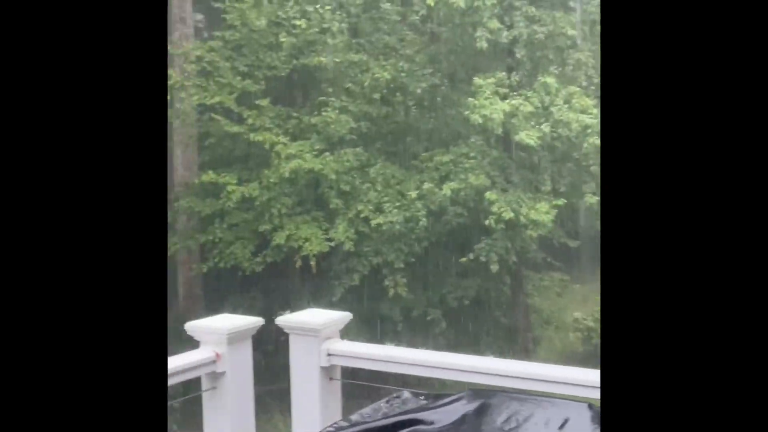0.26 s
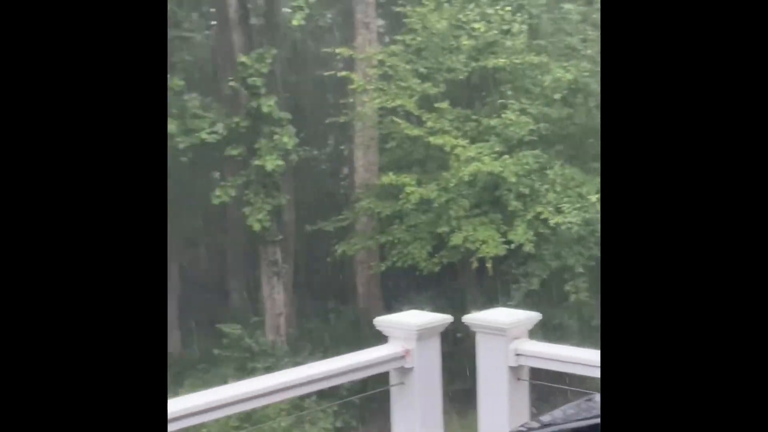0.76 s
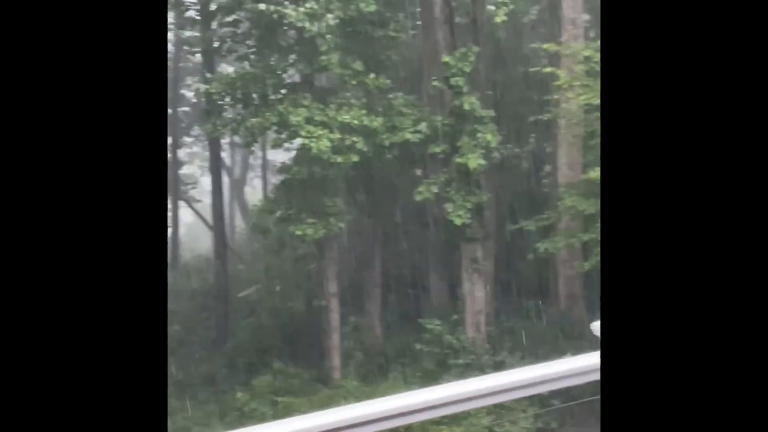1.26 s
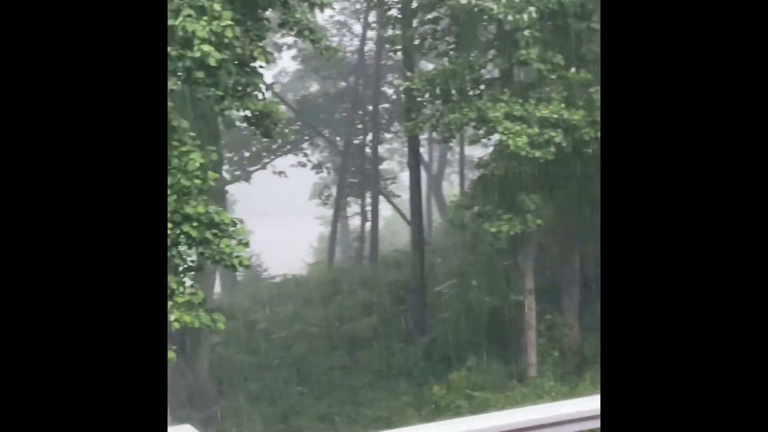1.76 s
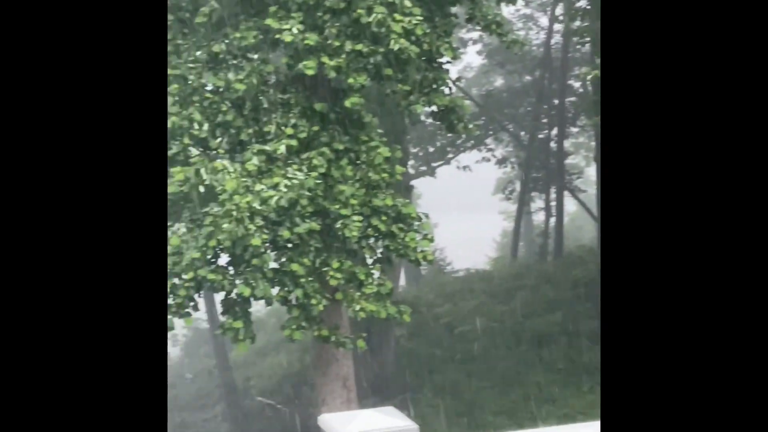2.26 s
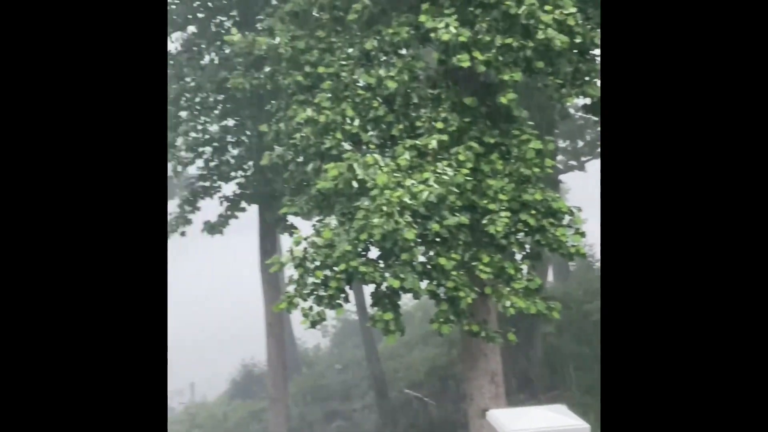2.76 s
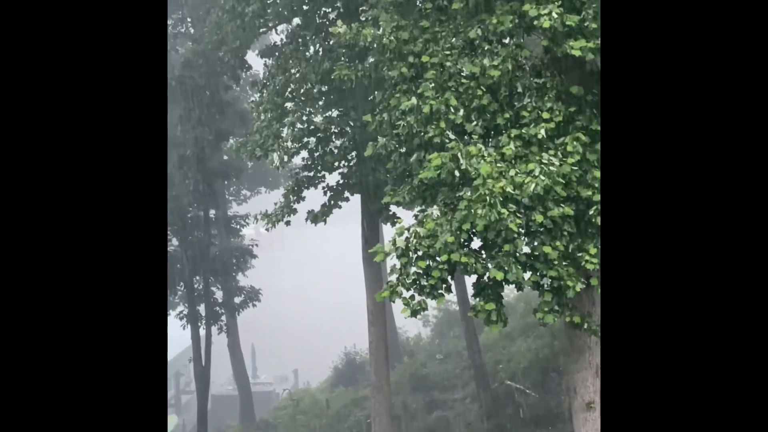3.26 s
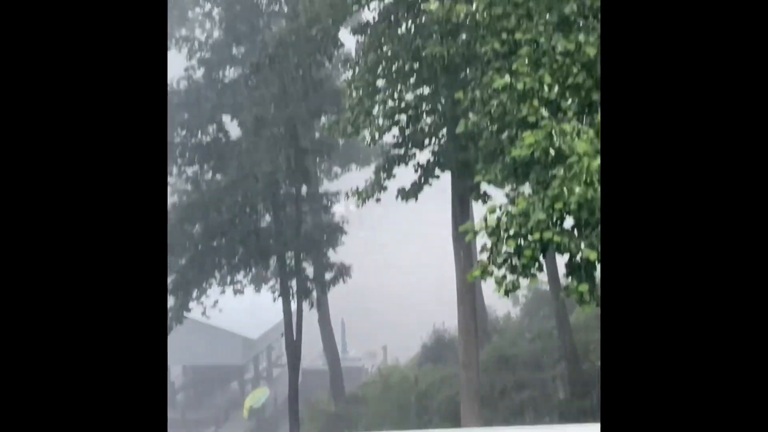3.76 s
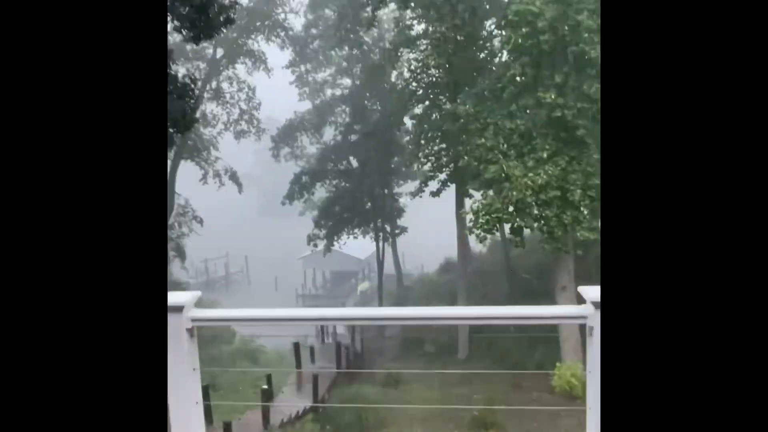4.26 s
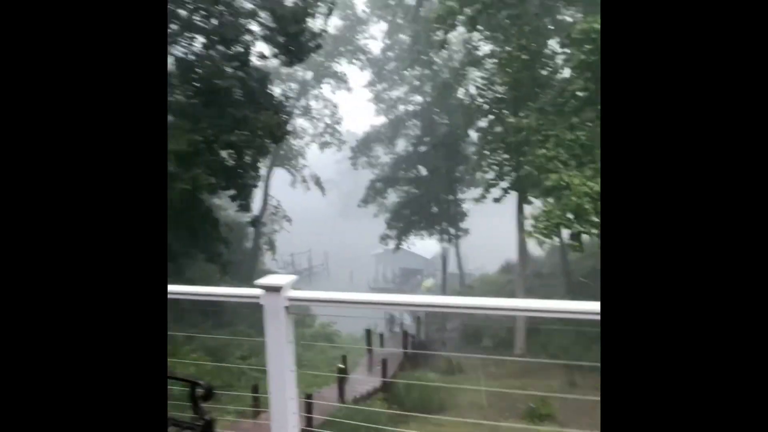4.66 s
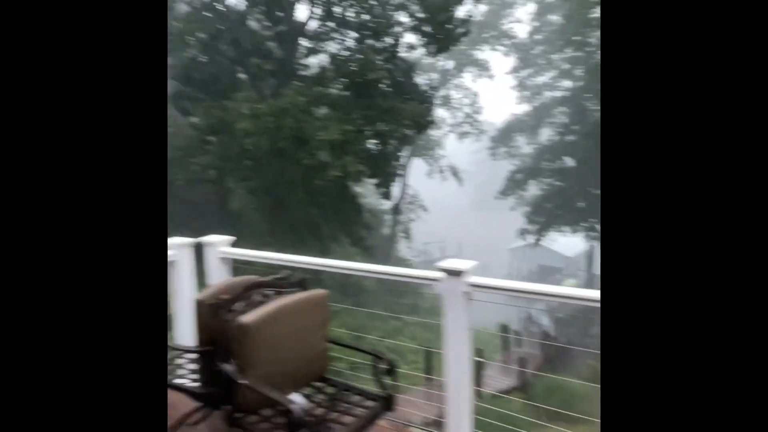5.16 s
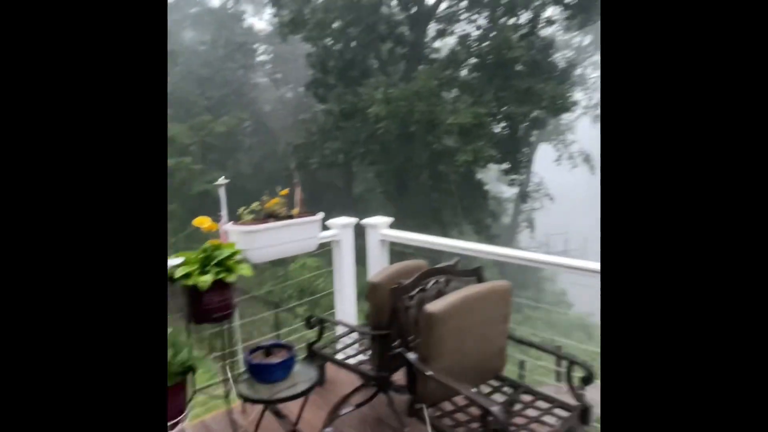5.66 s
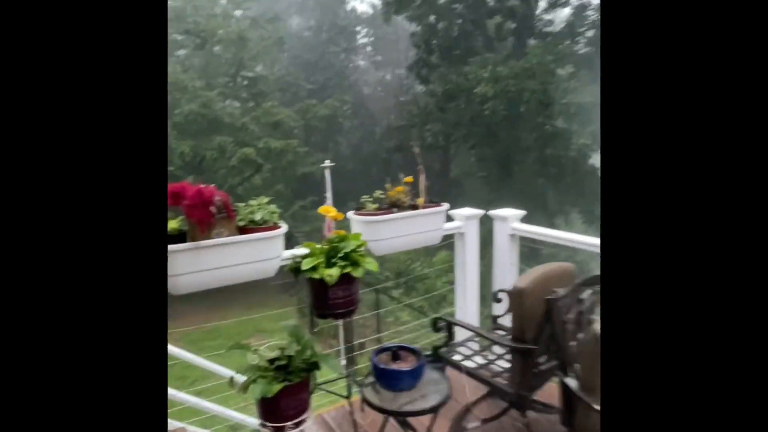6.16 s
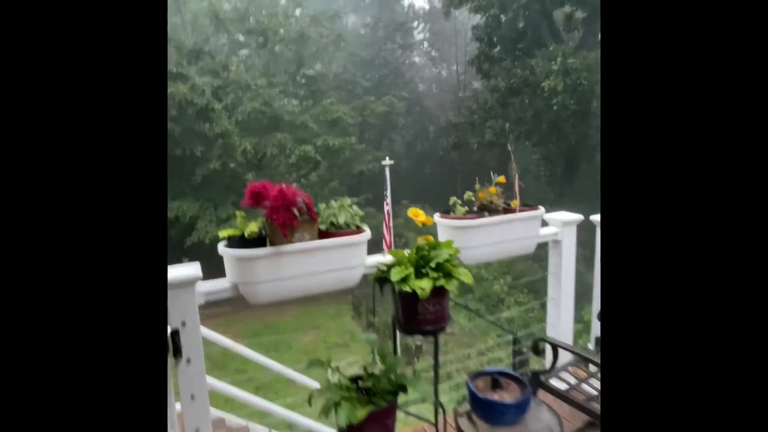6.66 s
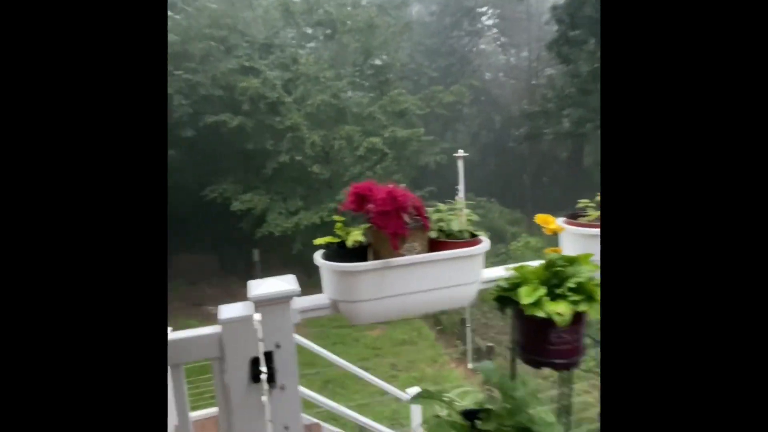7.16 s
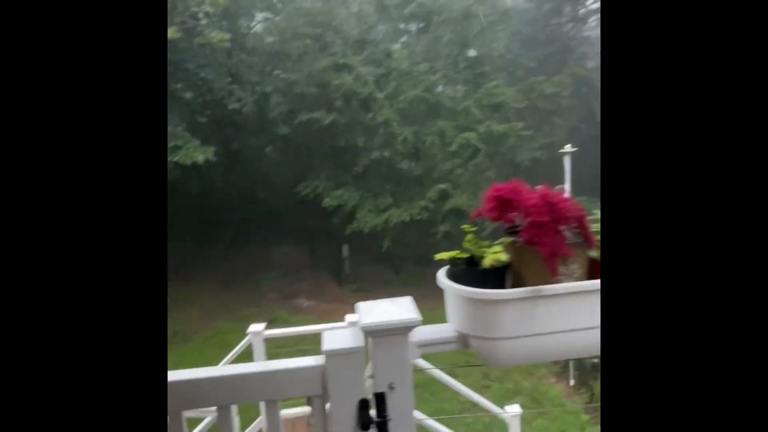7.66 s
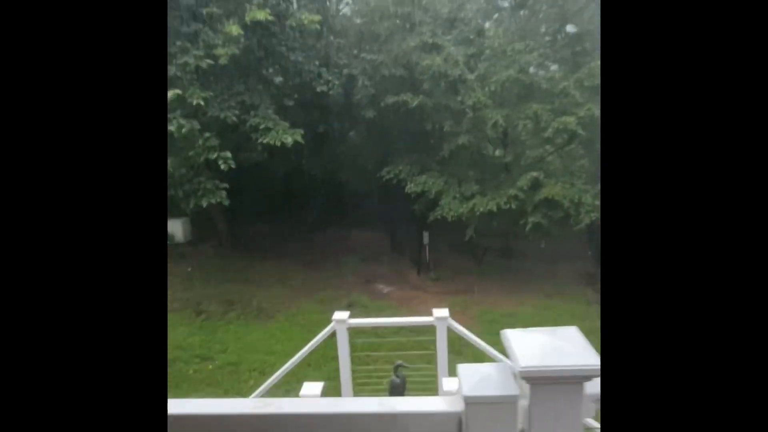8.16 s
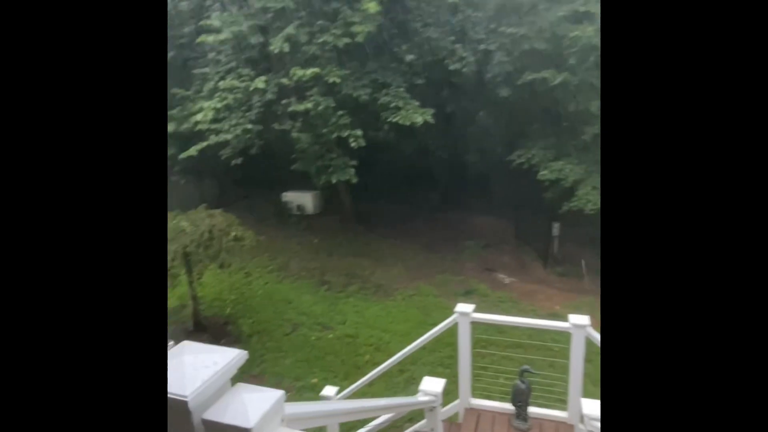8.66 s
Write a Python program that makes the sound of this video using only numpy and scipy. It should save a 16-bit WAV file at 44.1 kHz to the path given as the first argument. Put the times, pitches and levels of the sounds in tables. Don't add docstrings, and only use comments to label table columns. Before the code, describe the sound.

From a covered porch, a dense downpour roars evenly while hard drops tick nearby; faint far thunder thumps midway and again near the end.

```python
import sys
import numpy as np
from scipy import signal
from scipy.fft import rfft, irfft
from scipy.io import wavfile

SR = 44100
rng = np.random.default_rng(int(sys.argv[2]) if len(sys.argv) > 2 else 0)


def persist_wave(psi):
    counts = np.round(np.clip(psi, -1, 1) * 32767).astype(np.int16)
    wavfile.write(sys.argv[1], SR, np.atleast_2d(counts).T)


def boost(x):
    u = np.asarray(x, float) / 20
    return 10 ** u


N = 392490
HZ = np.maximum(np.arange(N // 2 + 1) * SR / N, 1)
SIDES = np.array([[1], [-1]])

# t/s, peak level/dB, f/Hz, push 1 or pull -1
THUNDER_POPS = [(4.0025, -20.5, 90, 1), (4.078, -40, 80, 1), (6.302, -38, 50, -1), (6.679, -39, 55, -1),
                (7.238, -29.5, 60, 1), (7.8705, -25.5, 80, -1), (7.925, -32, 70, -1), (7.971, -29, 80, 1),
                (8.705, -33, 60, -1), (8.735, -33, 62, 1), (8.882, -45, 60, -1)]


def in_time(rows):
    s, *columns = np.transpose(rows)
    return [np.interp(np.arange(N) / SR, s, c) for c in columns]


def rms_one(x):
    return x / np.sqrt(np.mean(x ** 2) + 1e-20)


def drift(rate):
    r = np.exp(-80 * np.pi * rate / SR)
    noise = rng.standard_normal(N // 40 + 2002)
    slow = signal.lfilter([1], [1, -2 * r, r * r], noise)[2000:]
    return np.interp(np.arange(N) / 40, np.arange(len(slow)), rms_one(slow))


def splashes(per_s, spread_db, last_s):
    hits = rng.random(N) < per_s / SR
    sizes = boost(2 * spread_db * np.minimum(rng.exponential(1, N), 3.2)) * hits
    power = signal.lfilter([1], [1, -np.exp(-1 / (last_s * SR))], sizes + 1e-12)
    return power / power.mean()


def rumble():
    steady_db, swell_db, swell_s = -.5, 3.5, 0.18
    t = np.arange(0, N, 441) / SR
    swell = sum(np.exp(-((t - pop[0]) / swell_s) ** 2 / 2) for pop in THUNDER_POPS)
    return steady_db + swell_db * np.interp(np.arange(N) / SR, t, np.tanh(swell / 2))


def rain_fields():
    # t/s, strength/dB
    rain_strength = [(0, 0.7), (.6, 0), (1.2, 1.05), (2, 0), (3, -0.2), (4.3, 0), (5.2, .6), (5.9, -.3),
                     (6.6, .3), (8.9, 0)]
    pivot_hz = 2010
    dulling_per_db, dulling_per_s = .5, 0.076
    (strength_db,), rumble_db = in_time(rain_strength), rumble()
    tilt_db = -dulling_per_db * strength_db - dulling_per_s * np.arange(N) / SR
    white = rfft(rng.standard_normal((2, N)))
    wide_splash = splashes(per_s=52.0, spread_db=7.0, last_s=0.0075)
    gust = drift(6.5)
    out = 0
    place = 2 * np.log2(np.clip(HZ, 62.5, 16000) / 62.5)
    for k in range(17):
        octaves = k / 2 + np.log2(62.5 / pivot_hz)
        near = np.clip(0.061 * (octaves + 0.52), 0, .9)
        fine_splash = splashes(per_s=40.0, spread_db=2.5, last_s=0.0022)
        grain = 1 - near + near * (0.4 * wide_splash + 0.66 * fine_splash)
        level_db = strength_db + tilt_db * max(octaves, 0) + rumble_db * np.clip(-octaves - 3.6, 0, 1)
        flicker_db = (0.08 + 0.35 * max(octaves, 0)) * (0.17 * gust + drift(9.0))
        band = irfft(white * np.maximum(1 - abs(place - k), 0), N)
        out = out + boost(level_db + flicker_db) * np.sqrt(grain) * band
    return rfft(out)


def port_shift(pair):
    lag_s = 0.000149
    hz, alike, lead, pan_db = np.transpose(pair)
    phase = np.interp(HZ, hz, lead) + 2 * np.pi * lag_s * np.maximum(HZ - hz[-1], 0)
    return np.exp(.5j * SIDES * phase) * boost(.5 * SIDES * np.interp(HZ, hz, pan_db))


def ports(fields, colour_db, pair, drops):
    likeness = np.interp(HZ, *np.transpose(pair)[:2])
    angle = np.arccos(np.clip(likeness, 0, 1)) / 2
    mix = np.cos(angle) * fields[0] + SIDES * np.sin(angle) * fields[1]
    coloured = mix * boost(colour_db) * np.sqrt(SR / 2)
    return irfft((coloured + drops) * port_shift(pair), N)


def rain():
    # t/s, width (0-1)
    beam_opening = [
        (0, 0.04),
        (4.14, 0.13),
        (4.4, 0.87),
        (8.9, .95),
    ]
    # f/Hz, narrow beam level/dB per Hz, wide beam level/dB per Hz
    rain_colour = [(25, -90, -87), (44.8, -71, -67.5), (68, -63, -65), (100, -68, -65), (127, -63, -62),
                   (202, -64.5, -65.5), (417, -64, -63.5), (610, -64.5, -64), (1540, -66, -64.5),
                   (1850, -64, -69), (2420, -64.5, -65.5), (3600, -67.5, -68.5), (5800, -70, -69),
                   (10000, -74.5, -77)]
    # f/Hz, likeness (0-1), left lead/radians, left-right level/dB
    narrow_pair = [(60, 1, 0.1, 0), (302, 0.98, 0.37, -2), (520, 0.9, -0.6, -4), (745, 0.67, 0.3, -3.5),
                   (1120, 0.98, -1, -2), (1700, 0.9, -0.3, 1), (1930, 0.9, -0.6, 3.5), (2560, 1, 0.98, 0),
                   (3600, .92, 0.5, 0), (4630, 0.91, 0, 0.5), (5500, 1, -0.14, 0), (6270, 1, 1.88, -0.5),
                   (7450, 1, 3, -0.5), (15600, .97, 10.5, 0.5)]
    wide_pair = [(60, 0.75, 0.4, 0), (130, 0.95, 0, -3), (325, 0.97, -0.2, -5), (553, 0.12, 1.2, -4),
                 (750, 0.53, 0.5, -4), (1110, 0.43, 0.47, 1), (1670, 0.81, -0.5, 0.5),
                 (2280, 0.34, 1.22, -0.5), (3240, .02, 1, 0), (4200, 0.55, 1.57, 0), (4700, 0.12, 1.5, 0.5),
                 (5500, 0.44, 0.6, -0.5), (7490, 0.81, 3.05, -0.4), (10700, 0.92, 6, -0.5)]
    hz, narrow_db, wide_db = np.transpose(rain_colour)
    edge_db = -14.5 * np.clip(np.log2(HZ / hz[-1]), 0, .44)
    edge_db = edge_db - 18.0 * np.maximum(np.log2(hz[0] / HZ), 0)
    peak_hz, peak_width_hz, peak_db = 15300, 700, 2.5
    edge_db = edge_db + peak_db * np.exp(-((HZ - peak_hz) / peak_width_hz) ** 2 / 2)
    fields, drops, (width,) = rain_fields(), rfft(rail_ticks()), in_time(beam_opening)
    width = np.clip(width + 0.037 + 0.058 * drift(7.4), 0, 1)
    narrow_db = np.interp(np.log(HZ), np.log(hz), narrow_db) + edge_db
    wide_db = np.interp(np.log(HZ), np.log(hz), wide_db) + edge_db
    narrow = ports(fields, narrow_db, narrow_pair, drops)
    wide = ports(fields, wide_db, wide_pair, drops)
    return (1 - width) * narrow + width * wide


def rail_ticks():
    # t/s, peak level/dB, f/Hz, left-right level/dB
    rail_drops = [(0.0124, -14.5, 7100, 0), (.351, -24, 4000, 0), (.3575, -27, 4500, 0),
                  (.728, -19, 9000, 0), (0.875, -21, 7900, 2), (1.1158, -18.5, 5500, 0),
                  (1.7139, -20, 5700, 1), (1.9043, -17.5, 4500, -2), (4.0244, -28, 6700, .5),
                  (4.7559, -20, 7700, -6), (5.01, -25, 3000, -6), (5.0823, -18.5, 2920, -1),
                  (5.2236, -19.5, 4300, -4), (5.3241, -14.5, 6000, -2), (5.576, -27, 8500, 3),
                  (5.6007, -20, 5500, 7), (5.657, -26, 10000, 1), (5.8414, -22, 5800, 12)]
    ring_cycles = .9
    echo_s, echo_db = .007, -9
    out, t = np.zeros((2, N)), np.arange(2000) / SR
    for s, peak_db, hz, pan_db in rail_drops:
        age = t * hz / ring_cycles
        ring = np.sin(2 * np.pi * hz * t) * age * np.exp(1 - age)
        band = signal.butter(2, [.7 * hz, min(1.4 * hz, 16000)], "band", fs=SR, output="sos")
        hiss = rms_one(signal.sosfilt(band, rng.standard_normal(len(t))))
        spray = hiss * boost(-19) * np.exp(-t / 0.022)
        echo = boost(echo_db) * np.roll(ring, round(echo_s * SR))
        at = round(s * SR)
        out[:, at:at + len(t)] += boost(peak_db + 5.0 + pan_db * .5 * SIDES) * (ring + echo + spray)
    return out


def thunder():
    pop_cycles, low_cut_hz = 0.76, 35
    out = np.zeros((2, N))
    for s, peak_db, hz, push in THUNDER_POPS:
        at = round(s * SR)
        length = pop_cycles / hz
        t = np.arange(-2000, min(4000, N - at)) / SR
        spread = np.where(t < 0, 0.76 * length, 1.5 * length)
        wave = np.cos(2 * np.pi * hz * (t - 15.0 * t ** 2))
        pop = np.sign(push) * wave * np.exp(-(t / spread) ** 2 / 2)
        out[:, at - 2000:][:, :len(t)] += boost(peak_db) * pop
    return signal.sosfilt(signal.butter(2, low_cut_hz, "high", fs=SR, output="sos"), out)


def scene():
    return rain() + thunder()


def top_cut(x):
    return signal.sosfilt(signal.butter(12, 15880, fs=SR, output="sos"), x)


def record(dry):
    slope = irfft(rfft(dry) * 2j * np.pi * HZ, N)
    wander_s = 1e-6 * (1.3 * drift(20.0) + 1.0 * drift(2.5))
    return top_cut(dry + SIDES * wander_s * slope)


dry = scene()
out = record(dry)
persist_wave(out)
```